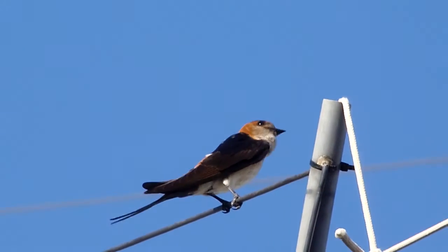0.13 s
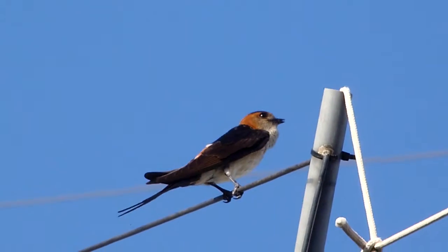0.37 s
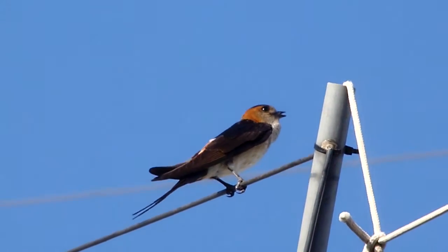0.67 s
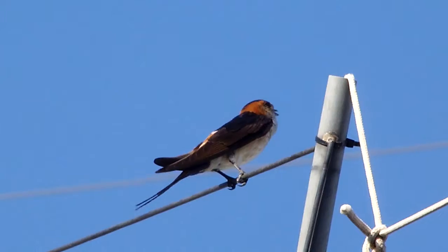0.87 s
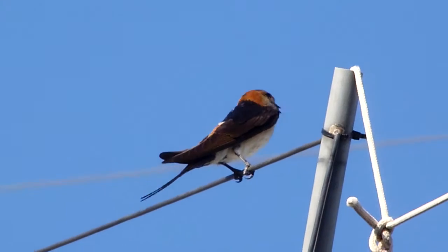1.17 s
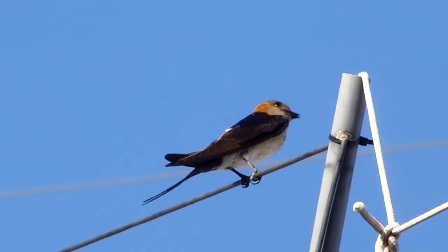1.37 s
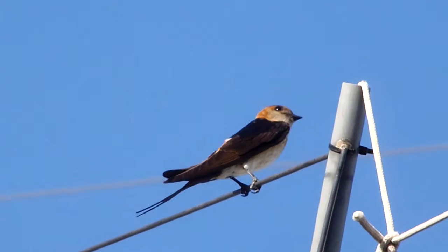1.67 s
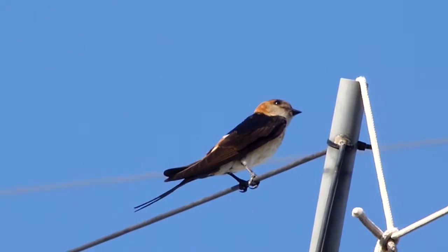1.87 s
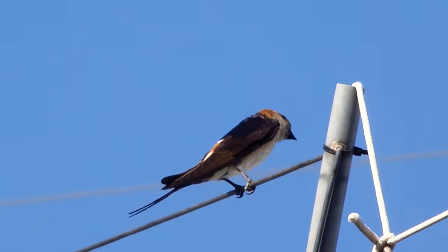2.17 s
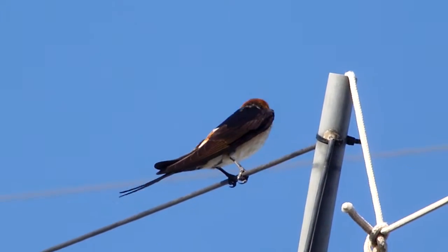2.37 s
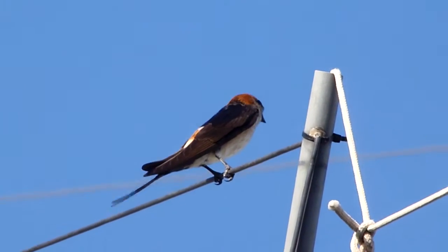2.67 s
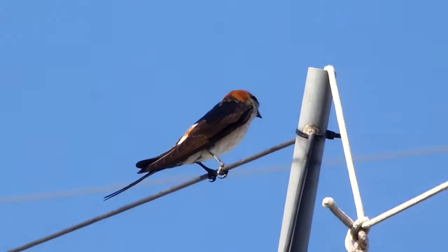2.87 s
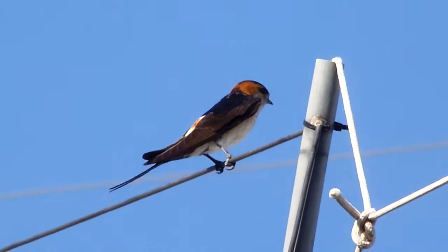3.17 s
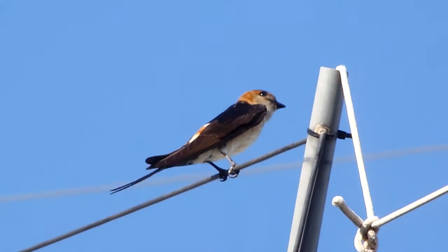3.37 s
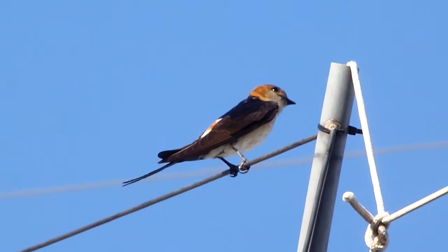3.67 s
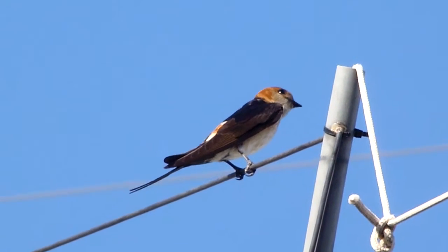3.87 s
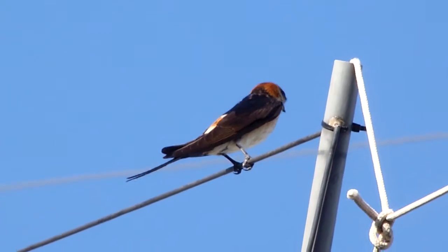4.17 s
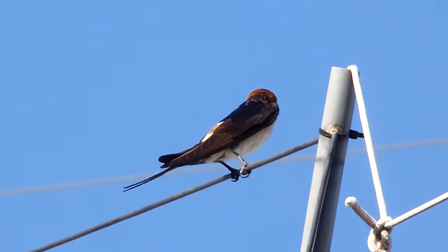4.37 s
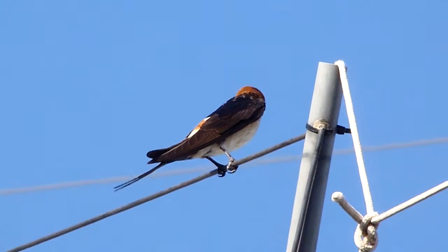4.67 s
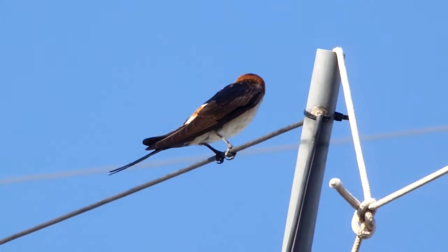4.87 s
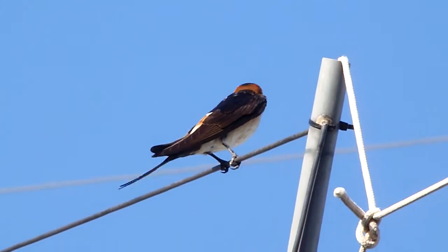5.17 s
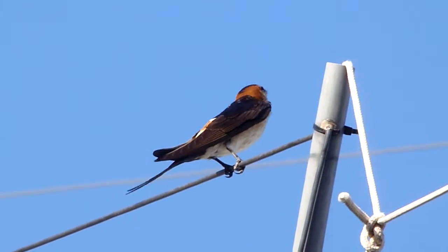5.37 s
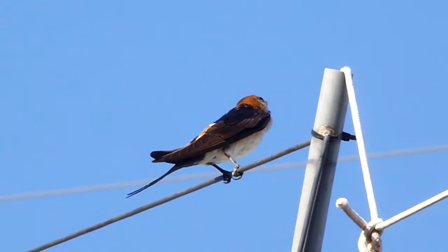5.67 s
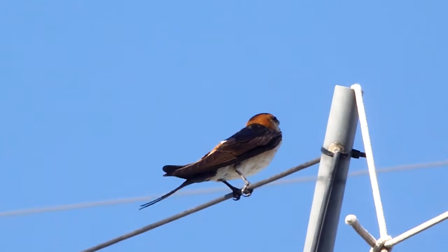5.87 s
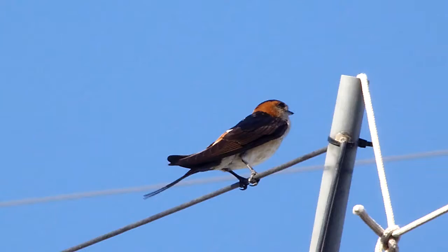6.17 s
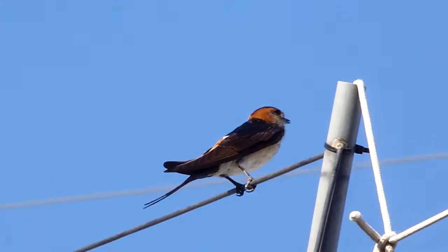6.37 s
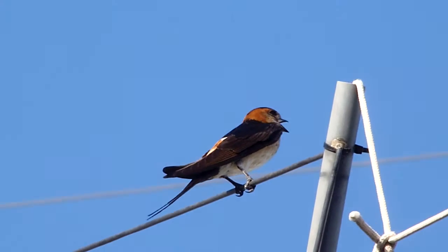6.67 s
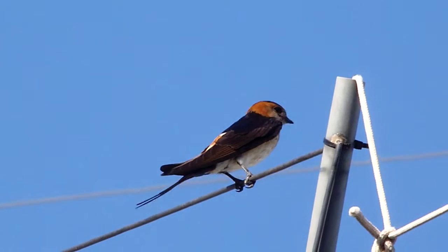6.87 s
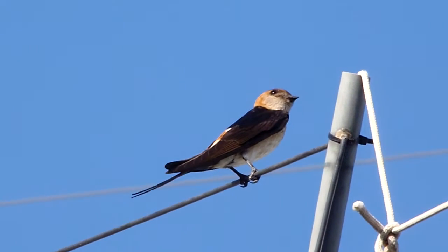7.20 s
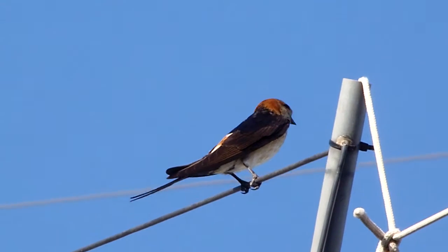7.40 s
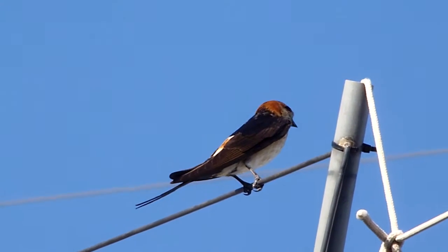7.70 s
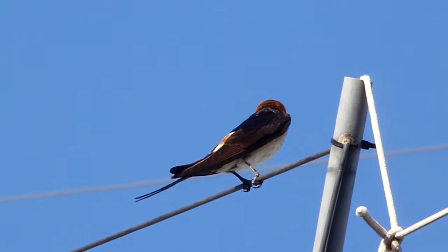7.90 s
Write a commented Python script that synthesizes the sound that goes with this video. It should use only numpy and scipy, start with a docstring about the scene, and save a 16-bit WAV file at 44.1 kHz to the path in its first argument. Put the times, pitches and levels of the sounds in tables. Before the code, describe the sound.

A swallow on a wire twitters in short spells of chirps, rising glides, nasal wheezes and a dry rattle over steady outdoor hiss.

```python
"""On a wire with walls nearby, a swallow sings several spells of twittering song.
Its two-sided voice box whistles, glides and wheezes: sine waves with sliding, trembling pitch.
Chips are quick sweeps, rasps are pulsed noise, and the dry rattle and bill snaps are damped rings.
The walls answer with single echoes and a scattered tail.
Behind the song lie a steady outdoor hiss and a low, far-off hum, both made of shaped noise.
"""
import sys
import numpy as np
from scipy import signal
from scipy.fft import rfft, irfft, next_fast_len
from scipy.io import wavfile

SR = 44100
rng = np.random.default_rng(int(sys.argv[2]) if len(sys.argv) > 2 else 0)


def file_out(sig):
    """Save sig as 16-bit WAV at sys.argv[1]."""
    # one column per channel
    cols = np.atleast_2d(sig).T
    # limit, then scale
    lim = np.clip(cols, -1, 1)
    pcm = np.round(lim * 32767).astype(np.int16)
    wavfile.write(sys.argv[1], SR, pcm)


N = 354563  # length of the scene in samples, about 8 s


def gain_of(db):
    """Turns decibels into an amplitude factor."""
    return 10 ** (np.asarray(db) / 20)


def evened(x):
    """Scales a sound to an rms of one."""
    return x / np.sqrt(np.mean(x ** 2) + 1e-20)


def add(mix, s, sound):
    """Mixes a sound in at time s, cutting off what runs past the end."""
    part = mix[max(round(s * SR), 0):][:len(sound)]
    part += sound[:len(part)]


def noise(count, shape):
    """Random noise, scaled to rms one, whose amplitude spectrum follows shape(Hz)."""
    size = next_fast_len(count + 4096)
    spectrum = rfft(rng.standard_normal(size)) * shape(np.fft.rfftfreq(size, 1 / SR))
    return evened(irfft(spectrum, size))[:count]


def waver(count, rate_hz):
    """A random wobble that is seldom much faster than rate_hz."""
    return noise(count, lambda f: np.exp(-(f / rate_hz) ** 2))


def curves(rows):
    """Sample times in seconds, then each column of the rows joined by straight lines."""
    s, *columns = np.transpose(rows)
    t = np.arange(s[0], s[-1], 1 / SR)
    return [t] + [np.interp(t, s, column) for column in columns]


def fade(count, edge_s=0.00092):
    """A soft start and end, so that nothing clicks."""
    return signal.windows.tukey(count, min(2 * edge_s * SR / count, 1))


def phase_of(hz, jitter, jitter_hz=350):
    """The running phase of a membrane whose pitch trembles by the share jitter."""
    trembling_hz = hz * (1 + jitter * waver(len(hz), jitter_hz))
    return 2 * np.pi * np.cumsum(trembling_hz) / SR


# All levels of the song are those before the walls and the mix of the voices.
# The long rising glide. Each row: time in seconds, pitch in Hz, level in dB.
GLIDE_PATH = [(.21, 2040, -57), (.285, 2397, -50.5), (.33, 2447, -54), (.36, 2543, -43.5),
              (.43, 2710, -50.5), (.55, 2770, -46.5), (.585, 2910, -52.5), (.65, 2990, -50.5),
              (.69, 3204, -45), (.72, 3360, -53), (.79, 3270, -53)]
# Weak extra tones of the glide. Each row: multiple of its pitch, level in dB among these tones.
GLIDE_EXTRA_TONES = [(1 / 2, -2.4), (2 / 3, 0), (4 / 3, -1.7), (3 / 2, 0), (2, -16)]
# The extra tones start faint and grow through the glide.
BUZZ_DB, BUZZ_DB_PER_S = -64.5, 7


def glide(jitter=0.008, slip_radians=0.63):
    """A rising tone; the membranes also swing loosely at 1/2 and 1/3 of its pitch: a nasal edge."""
    t, hz, db = curves(GLIDE_PATH)
    phase = phase_of(hz, jitter)
    buzz = np.zeros(len(t))
    for multiple, level in GLIDE_EXTRA_TONES:
        slip = slip_radians * waver(len(t), 71.4)
        buzz += gain_of(level) * np.sin(multiple * phase + slip)
    buzz_gain = gain_of(BUZZ_DB + BUZZ_DB_PER_S * (t - t[0]))
    tone = gain_of(db) * np.sin(phase) + buzz_gain * buzz
    return t[0], np.sqrt(2) * tone * fade(len(t))


# Whistled notes; overlapping ones come from the two sides of the voice box.
# Each row: start in seconds, length in seconds, first pitch in Hz, last pitch in Hz,
# level at the crest in dB, place of the crest from 0 (start) to 1 (end).
WHISTLE_NOTES = [ (0.034, .009, 10700, 9900, -50, .5), (0.747, .022, 2595, 2600, -48, .4),
                 (0.778, .026, 1910, 2466, -43, .6), (.872, .018, 2310, 2350, -49, .6),
                 (0.9, 0.01, 2710, 3110, -30.5, 0.65), (.909, 0.011, 3140, 3304, -31, 0.64),
                 (.95, 0.024, 1570, 1610, -48.5, 0.6), (1.156, .019, 4820, 5060, -55, .5),
                 (1.173, 0.057, 3470, 3460, -50, 0.3), (1.475, 0.025, 1840, 1830, -50.5, 0.9),
                 (1.504, 0.027, 2740, 2950, -49, 0.9), (2.494, 0.049, 3560, 3070, -50.5, 0.2),
                 (3.645, .04, 3580, 3250, -53, 0.2), (3.808, 0.045, 3350, 2910, -51, 0.4),
                 (4.724, 0.086, 2100, 4300, -43, 1), (4.738, 0.098, 1480, 2174, -48.5, 0.7),
                 (4.766, 0.057, 2430, 3460, -41, 0.96), (4.785, .047, 5170, 5650, -59, .6),
                 (5.21, 0.014, 2430, 2610, -39.5, 0.7), (5.223, 0.0298, 3267, 3403, -33, 0.6),
                 (5.222, 0.037, 2756, 3140, -39, 0.7), (5.296, 0.056, 3280, 3410, -46.5, 0.94),
                 (5.325, 0.044, 3550, 4220, -49, .6), (5.361, 0.016, 2950, 2843, -40, 0.6),
                 (5.376, 0.026, 1890, 2030, -46.5, 0.9), (5.395, 0.029, 3830, 4460, -49, .7),
                 (5.399, .024, 2686, 2974, -39.5, 0.4), (5.624, 0.038, 3410, 2960, -53, .6),
                 (5.689, 0.047, 2080, 2163, -52.5, 0.3), (5.725, 0.052, 2820, 2920, -53, .8),
                 (5.81, 0.02, 1780, 2410, -45, 0.6), (5.842, 0.017, 1800, 1990, -49, .5),
                 (5.858, .018, 2920, 2940, -51, .7), (5.876, 0.048, 2080, 2256, -52, .8),
                 (6.189, .026, 1844, 2174, -43.5, 0.24), (6.463, .011, 3700, 4100, -52, .5),
                 (7.135, .047, 3350, 3080, -56.5, 0.7), (7.328, 0.041, 3170, 2980, -54.5, 1),
                 (7.546, 0.035, 3090, 3010, -49.5, 0.5)]
SWELL_DB, SINK_DB = 9, 10  # rise up to the crest, fall after it
SLIDE_SHARE, SLIDE_STEEP = .37, 1.31  # share of the note by which most of the slide is done; steepness


def whistle(s, length, start_hz, end_hz, db, crest, jitter=0.0075, flutter_db=2.0,
            octave_db=-30, hoarse_db=-15, hoarse_hz=900):
    """A nearly pure note with a hoarse fringe, sliding onto its final pitch."""
    u = np.linspace(0, 1, round(length * SR))  # progress through the note
    slide_left = np.exp(-(u / SLIDE_SHARE) ** SLIDE_STEEP)
    phase = phase_of(end_hz + (start_hz - end_hz) * slide_left, jitter)
    swell_db = np.interp(u, [0, np.clip(crest, 0, 1), 1], [-SWELL_DB, 0, -SINK_DB])
    flutter = flutter_db * waver(len(u), 550)
    fringe = gain_of(hoarse_db) * waver(len(u), hoarse_hz) * np.cos(phase)
    tone = np.sin(phase) + gain_of(octave_db) * np.sin(2 * phase) + fringe
    return s, np.sqrt(2) * tone * gain_of(db + swell_db + flutter) * fade(len(u))


# Nasal wheezes, one list of rows for each.
# Each row: time in seconds, pulse rate in Hz, throat resonance in Hz, level in dB.
WHEEZE_PATHS = [
    [(1.24, 641, 4640, -58), (1.33, 601, 4210, -52), (1.435, 604, 4200, -50), (1.455, 611, 3650, -47.5),
     (1.495, 620, 3700, -53)],
    [(6.24, 430, 2550, -63), (6.295, 488, 2900, -58), (6.39, 480, 2900, -57.5), (6.445, 502, 2940, -54)],
]
# A wheeze starts rough and settles: roughness (0-1) at first and later, and the settling time.
ROUGH_START, ROUGH_HELD, SETTLE_S = 0.81, 0.072, 0.041


def wheeze(rows, throat_width_hz=170, skirt_db=-17, low_hz=1700, high_hz=6100, jitter=0.043, flutter_db=3.5):
    """A stack of harmonics, strongest near the throat's resonance; uneven pulses smear them."""
    t, hz, throat_hz, db = curves(rows)
    rough = ROUGH_HELD + (ROUGH_START - ROUGH_HELD) * np.exp(-(t - t[0]) / SETTLE_S)
    phase = phase_of(hz, jitter * rough + .002)
    k = np.arange(2, 14)[:, None]  # harmonic numbers, one line each
    heights = 1 / (1 + ((k * hz - throat_hz) / throat_width_hz) ** 2) + gain_of(skirt_db)
    # Harmonics below low_hz and above high_hz die away.
    heights /= np.sqrt((1 + (low_hz / (k * hz)) ** 12) * (1 + (k * hz / high_hz) ** 12))
    tone = (heights * np.sin(k * phase + k ** 2)).sum(0)  # k ** 2 scatters the starting phases
    flutter = flutter_db * waver(len(t), 120)
    return t[0], np.sqrt(2) * tone * gain_of(db + flutter) * fade(len(t))


# Each row: start in seconds, first pitch in Hz, last pitch in Hz, level in dB.
CHIP_NOTES = [(.039, 6100, 5100, -44), (0.048, 5100, 4470, -31.5), (.894, 5280, 2600, -44),
              (.98, 2860, 1890, -47.5), (4.107, 5940, 4900, -46), (4.118, 5130, 4430, -37),
              (4.123, 4630, 4400, -38), (5.209, 4900, 2610, -48), (5.461, 6200, 5100, -44.5),
              (6.156, 2850, 1800, -47.5), (6.493, 4800, 4300, -49)]
CHIP_S = 0.00674


def chip(s, start_hz, end_hz, db, octave_db=-26):
    """One downward sweep of a few milliseconds, heard as a sharp tick or chirp."""
    count = round(CHIP_S * SR)
    phase = phase_of(np.linspace(start_hz, end_hz, count), 0.013)
    tone = np.sin(phase) + gain_of(octave_db) * np.sin(2 * phase)
    return s, gain_of(db) * evened(tone * fade(count, 0.002))


# Hoarse notes. Each row: start in seconds, length in seconds, centre in Hz, width in Hz, level in dB.
RASP_NOTES = [(0.013, 0.021, 4700, 1500, -47), (.055, 0.034, 4900, 500, -46),
              (.68, 0.17, 2920, 1400, -53.5), (0.913, .065, 4660, 1600, -54),
              (.922, 0.096, 3140, 420, -46.5), (1.175, 0.15, 3250, 600, -58), (1.246, .13, 4630, 1200, -53),
              (2.485, .015, 5200, 890, -58), (2.567, 0.063, 4070, 1310, -50.5),
              (3.113, .03, 4740, 500, -59), (3.14, 0.091, 3700, 1000, -58.5),
              (3.391, .082, 3900, 1300, -51.5), (3.66, 0.052, 3270, 500, -55.5),
              (4.074, 0.029, 4750, 750, -46.5), (4.081, 0.019, 2970, 500, -52),
              (4.116, 0.035, 4780, 650, -42), (5.425, .032, 4730, 800, -50.5),
              (5.465, 0.0454, 5270, 700, -49.5), (5.616, .01, 5000, 800, -54),
              (5.663, 0.066, 3100, 700, -56.5), (5.785, .11, 2630, 1200, -54.5),
              (6.103, 0.06, 4030, 1200, -57), (6.16, 0.12, 2020, 400, -58), (6.294, 0.15, 3400, 1400, -57),
              (6.491, .31, 4800, 1100, -62)]


def rasp(s, length, centre_hz, width_hz, db, pulse_hz=170, depth=0.22):
    """Chaotic vibration in the throat's resonance, made as a noise band in uneven pulses."""
    count = round(length * SR)
    hoarse = noise(count, lambda f: 1 / (1 + (2 * (f - centre_hz) / width_hz) ** 4) ** .5)
    pulses = 1 + depth * np.sin(phase_of(np.full(count, pulse_hz), 0.53))
    return s, gain_of(db) * evened(hoarse * pulses * fade(count, 0.0023))


def click(s, db, modes, scatter=0.025, contact_s=0.00013):
    """One sharp pulse into a few heavily damped resonances, never twice quite alike."""
    t = np.arange(SR // 250) / SR  # 4 ms
    ring = np.zeros(len(t))
    for hz, width, level in modes:
        scattered_hz = hz * (1 + scatter * rng.standard_normal())
        ring += gain_of(level) * np.exp(-np.pi * width * t) * np.sin(2 * np.pi * scattered_hz * t)
    return s, gain_of(db) * evened(ring * (1 - np.exp(-t / contact_s)))  # a soft start dulls the top


# What a tick of the rattle rings with.
# Each row: typical pitch in Hz, width in Hz (wider dies sooner), level in dB against the others.
RATTLE_RINGS = [(4460, 260, -2.5), (5650, 390, 1)]
# First tick, first gap, growth of each gap, level at the middle of the run.
RATTLE_START_S, RATTLE_GAP_S, RATTLE_SLOWING_S, RATTLE_DB = 6.495, 0.033, .00024, -49


def rattle(count=10, ends_db=-4, uneven_db=1):
    """Dry ticks that swell and sink, each gap a little longer than the last."""
    gaps = RATTLE_GAP_S + RATTLE_SLOWING_S * np.arange(count)
    times = RATTLE_START_S + np.cumsum(gaps) - gaps
    arch_db = ends_db * np.linspace(-1, 1, count) ** 2
    levels = RATTLE_DB + arch_db + uneven_db * rng.standard_normal(count)
    return [click(s, db, RATTLE_RINGS) for s, db in zip(times, levels)]


# The bill snaps shut. Each row: time in seconds, level in dB.
BILL_SNAPS = [(3.998, -42.5), (4.8747, -41.5)]
# What a snap rings with.
# Each row: typical pitch in Hz, width in Hz (wider dies sooner), level in dB against the others.
SNAP_RINGS = [(4600, 1060, 0), (7000, 5500, 4)]


def bill_snaps():
    """Each snap of the bill is one short click with a broad, dull ring."""
    return [click(s, db, SNAP_RINGS) for s, db in BILL_SNAPS]


def swallow(glide_db=0, whistle_db=0, wheeze_db=-1, chip_db=1):
    """All the notes of the song, each kind of voice raised or lowered by its own dB."""
    song = np.zeros(N)
    voices = [(glide_db, [glide()]),
              (whistle_db, [whistle(*row) for row in WHISTLE_NOTES]),
              (wheeze_db, [wheeze(rows) for rows in WHEEZE_PATHS]),
              (chip_db, [chip(*row) for row in CHIP_NOTES]),
              (0, rattle()),
              (0, bill_snaps()),
              (0, [rasp(*row) for row in RASP_NOTES])]
    for db, notes in voices:
        for s, sound in notes:
            add(song, s, gain_of(db) * sound)
    return song


# Single echoes from the nearest walls.
# Each row: delay in seconds, level in dB against the direct sound.
WALL_ECHOES = [(.0042, -10.5), (0.0143, -7.5), (.017, -16), (.0215, -14)]


def walls(x, tail_db=-6, t60=0.56, gap_s=0.012):
    """The direct sound, a few single echoes, and a scattered tail that falls 60 dB in t60 seconds."""
    t = np.arange(SR * 3 // 4) / SR
    taps = rng.standard_normal(len(t)) * (rng.random(len(t)) < 3000 / SR)  # about 3000 a second
    response = taps * gain_of(-60 * t / t60) * (t > gap_s)
    response *= gain_of(tail_db) / np.linalg.norm(response)
    response[0] = 1  # the direct sound
    for delay, db in WALL_ECHOES:
        add(response, delay, gain_of([db]))
    return signal.fftconvolve(x, response / np.linalg.norm(response))[:N]


# The colour of the outdoor hiss. Each row: frequency in Hz, relative level in dB per Hz.
HISS_COLOUR = [(12, -11), (26, -2.5), (55, -2), (110, -5.5), (250, -10), (500, -15), (1100, -17),
               (2000, -20), (2700, -23), (4500, -23), (6200, -28), (8000, -31.5), (10000, -33.5),
               (15500, -36.5)]
HISS_DB = -48.5  # its overall level
# The far-off hum. Each row: time in seconds, level in dB.
HUM_LEVELS = [(0, -65), (2.8, -63), (4.1, -59), (5.05, -50), (5.3, -77), (7.4, -74), (8.0, -54)]


def outdoors(hum_hz=53, hum_width_hz=7):
    """Steady coloured noise as hiss, and a narrow band of low noise as a hum that comes and goes."""
    hz, db = np.transpose(HISS_COLOUR)
    hiss = noise(N, lambda f: gain_of(np.interp(np.log(f + 1), np.log(hz), db)))
    hum = noise(N, lambda f: np.exp(-((f - hum_hz) / hum_width_hz) ** 2))
    hum_db = np.interp(np.arange(N) / SR, *np.transpose(HUM_LEVELS))
    return hiss * gain_of(HISS_DB) + hum * gain_of(hum_db)


def scene():
    """Bird and background, alike in both channels."""
    mono = walls(swallow()) + outdoors()
    return np.array([mono, mono])


NOTCH_HZ, EDGE_HZ = 7830, 15750


def record(dry, notch_width_hz=420):
    """Cuts a narrow notch in the treble and, with a steep filter, all that lies above EDGE_HZ."""
    notched = signal.lfilter(*signal.iirnotch(NOTCH_HZ, NOTCH_HZ / notch_width_hz, SR), dry)
    edge = signal.firwin(801, EDGE_HZ, window=("kaiser", 9), fs=SR)
    return signal.oaconvolve(notched, edge[None], "same")


dry = scene()
out = record(dry)
file_out(out)
```